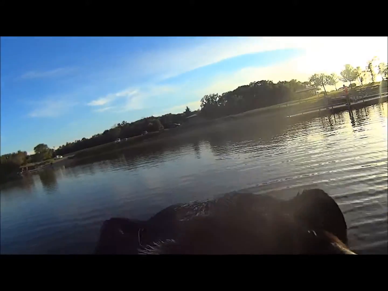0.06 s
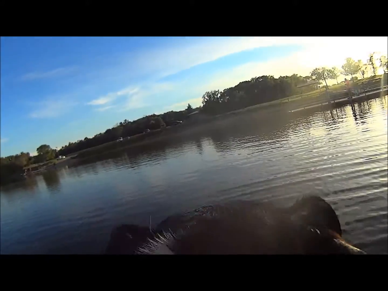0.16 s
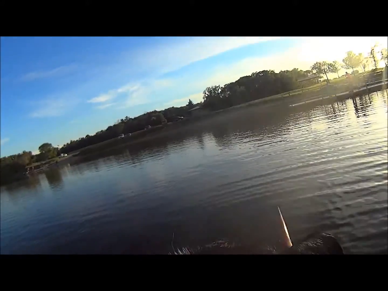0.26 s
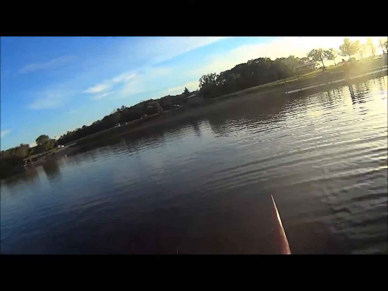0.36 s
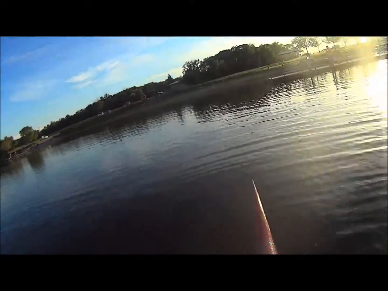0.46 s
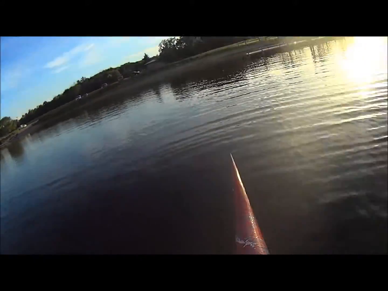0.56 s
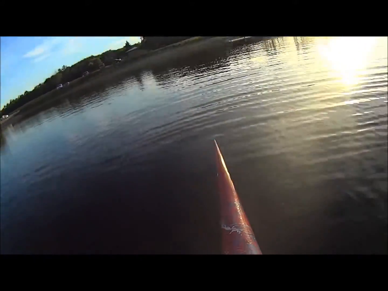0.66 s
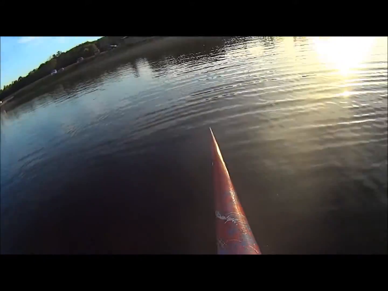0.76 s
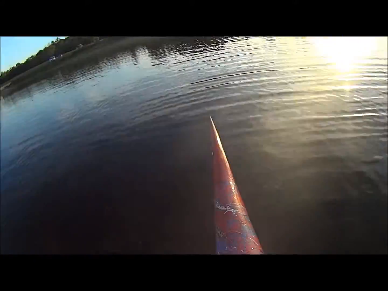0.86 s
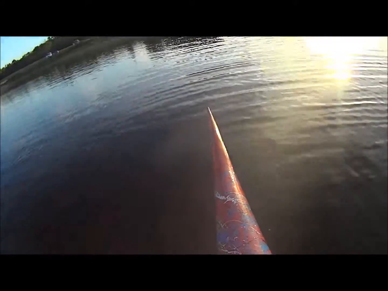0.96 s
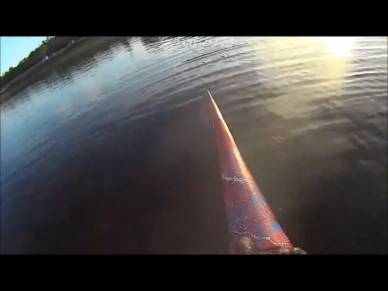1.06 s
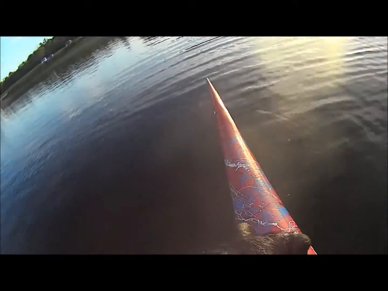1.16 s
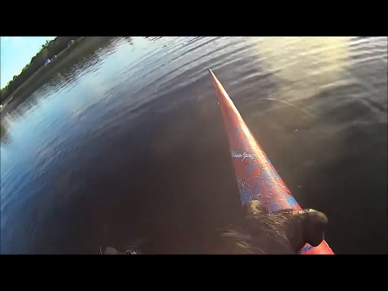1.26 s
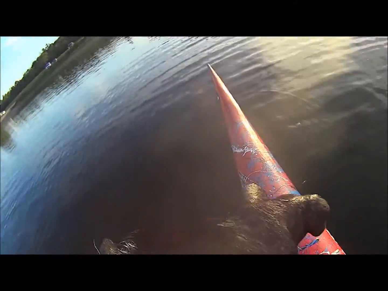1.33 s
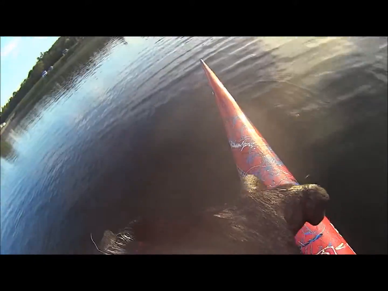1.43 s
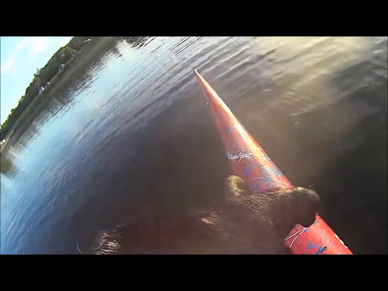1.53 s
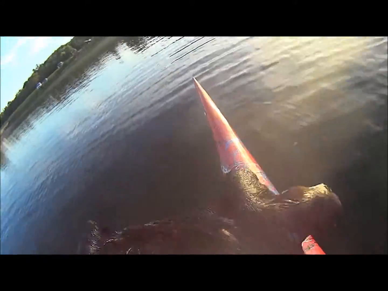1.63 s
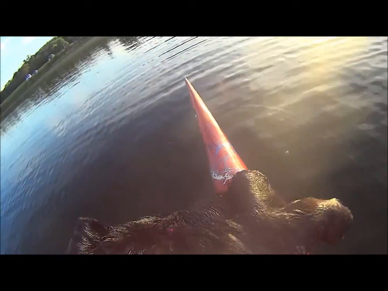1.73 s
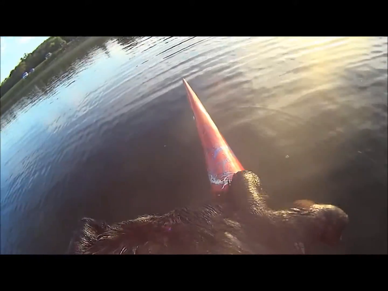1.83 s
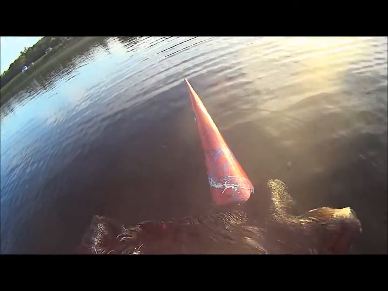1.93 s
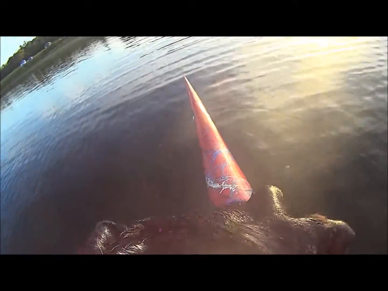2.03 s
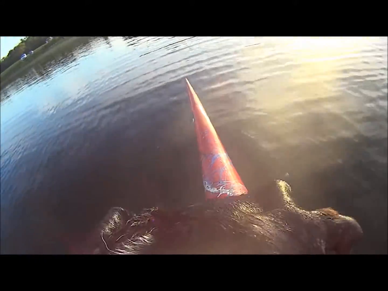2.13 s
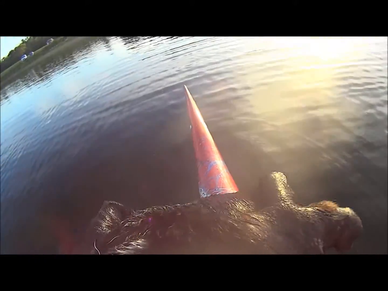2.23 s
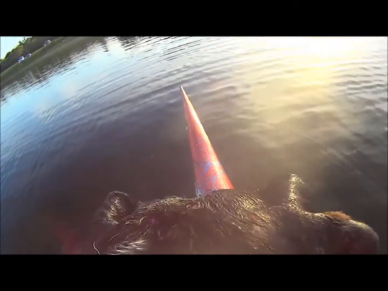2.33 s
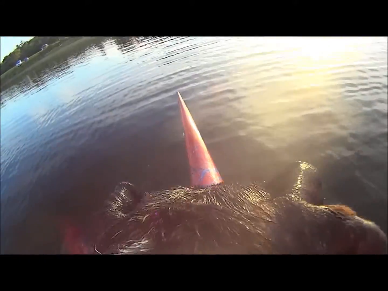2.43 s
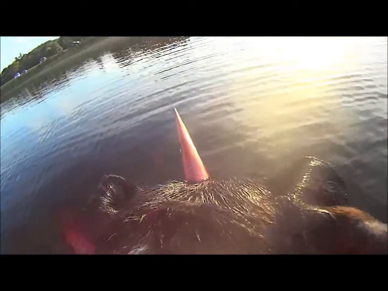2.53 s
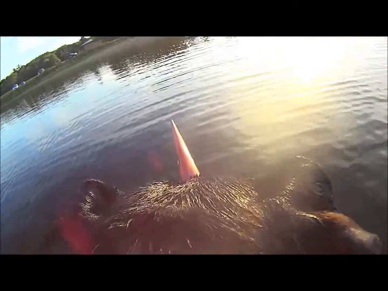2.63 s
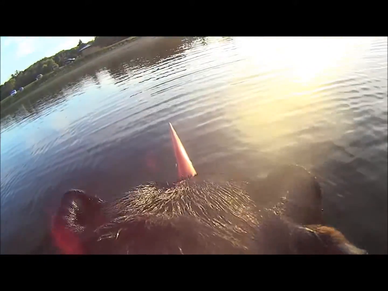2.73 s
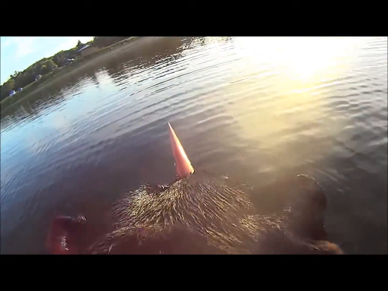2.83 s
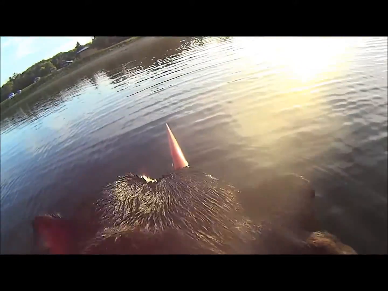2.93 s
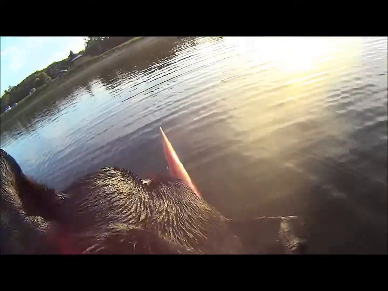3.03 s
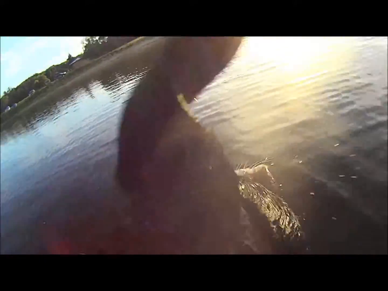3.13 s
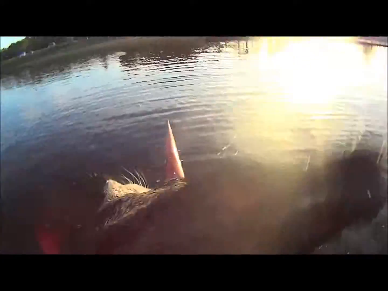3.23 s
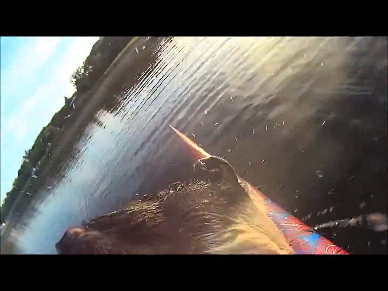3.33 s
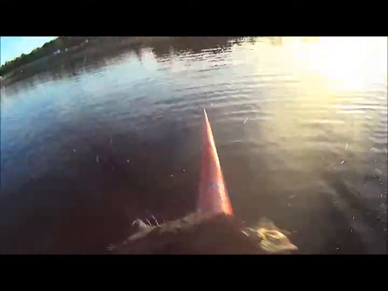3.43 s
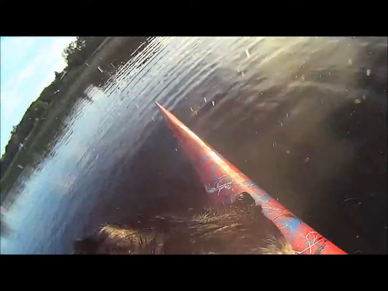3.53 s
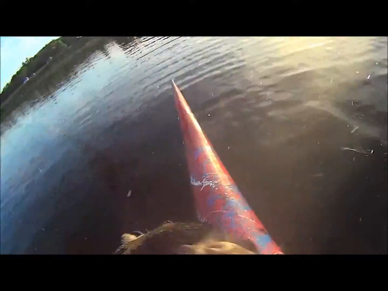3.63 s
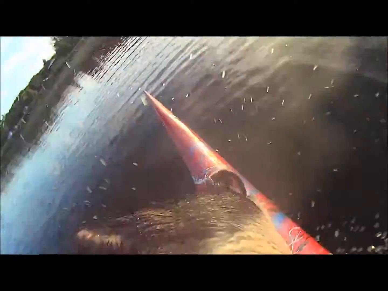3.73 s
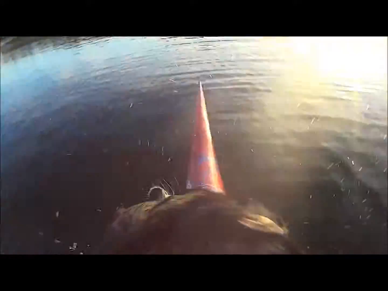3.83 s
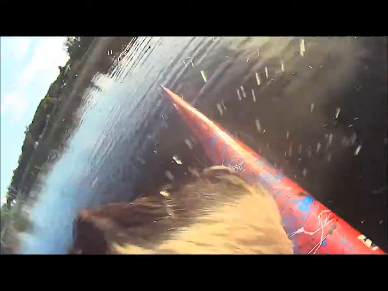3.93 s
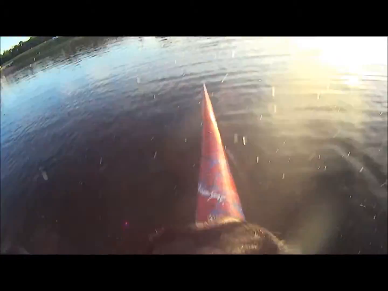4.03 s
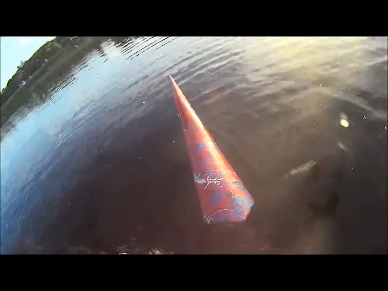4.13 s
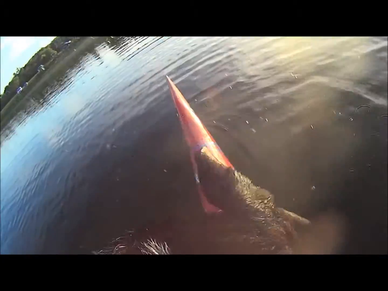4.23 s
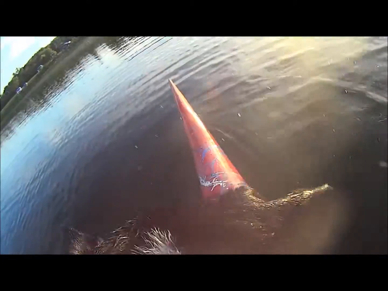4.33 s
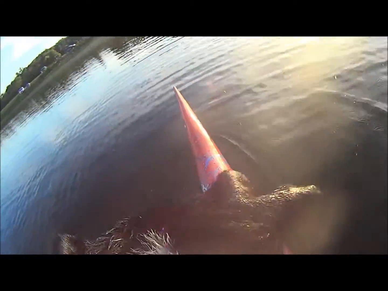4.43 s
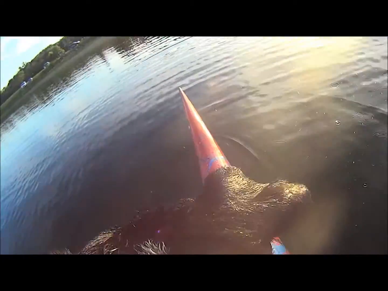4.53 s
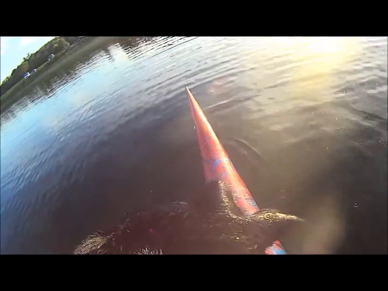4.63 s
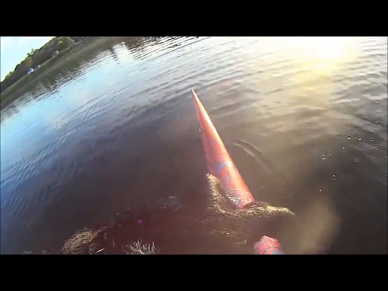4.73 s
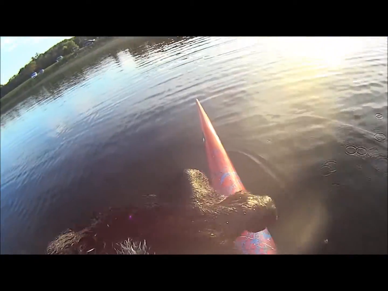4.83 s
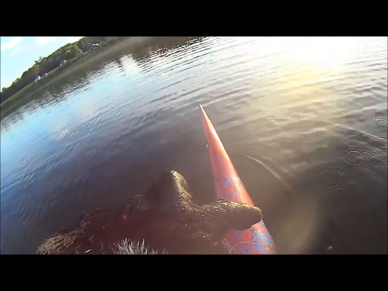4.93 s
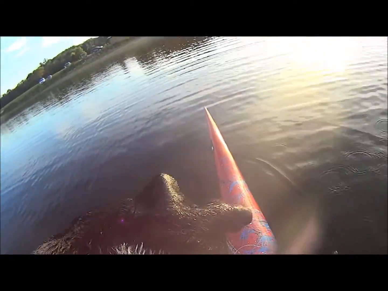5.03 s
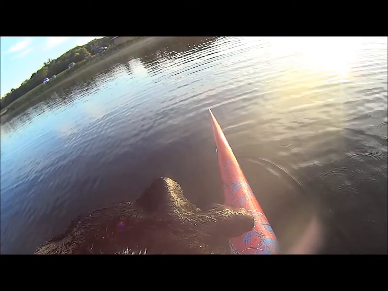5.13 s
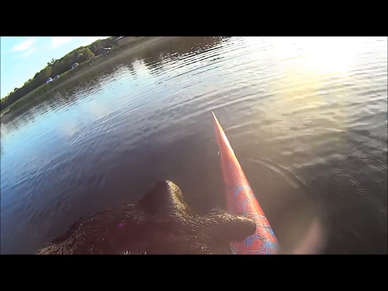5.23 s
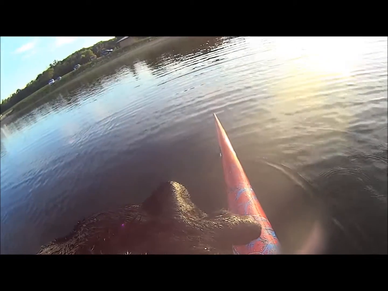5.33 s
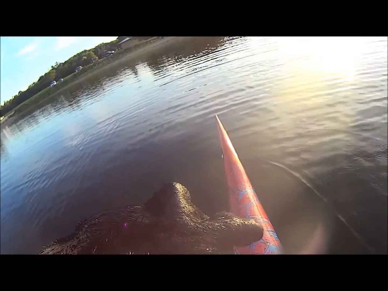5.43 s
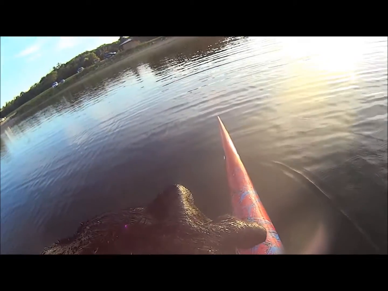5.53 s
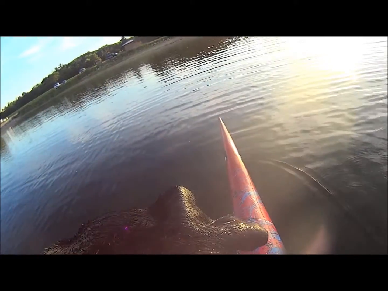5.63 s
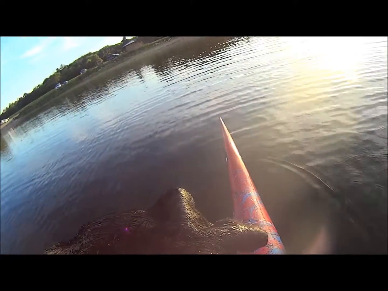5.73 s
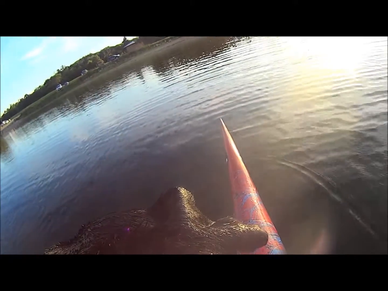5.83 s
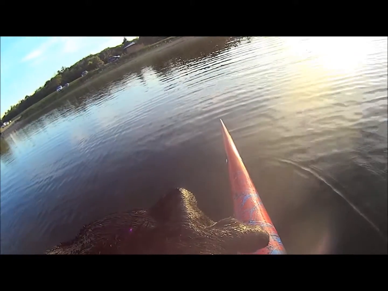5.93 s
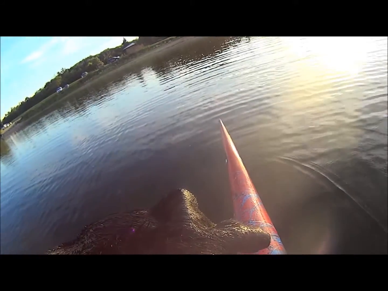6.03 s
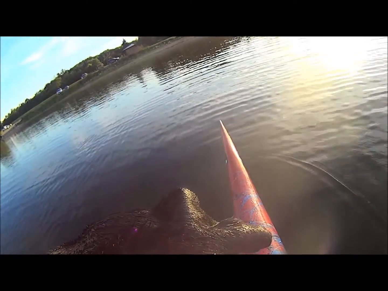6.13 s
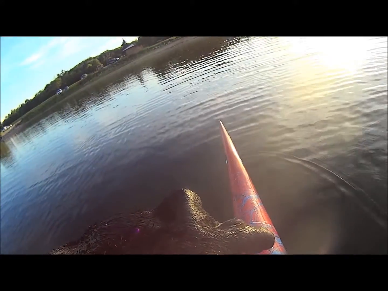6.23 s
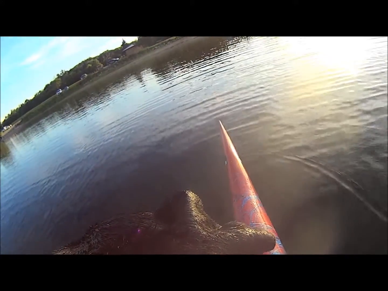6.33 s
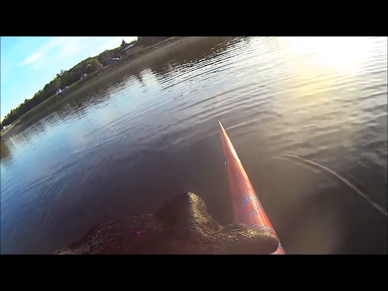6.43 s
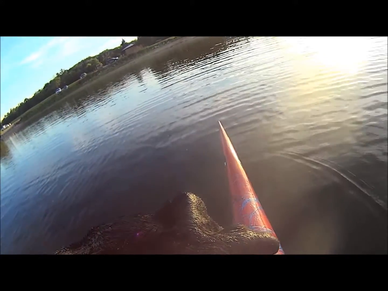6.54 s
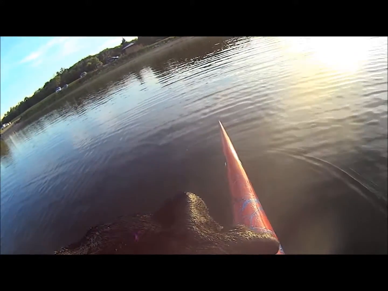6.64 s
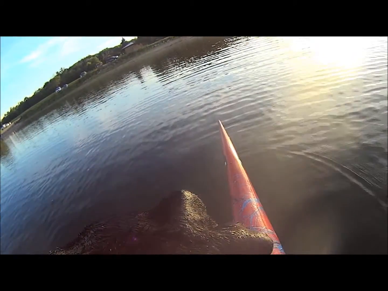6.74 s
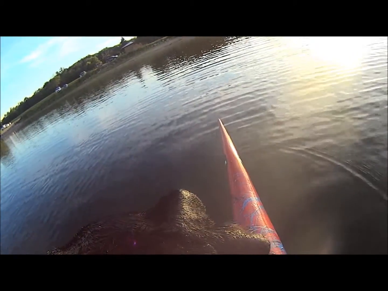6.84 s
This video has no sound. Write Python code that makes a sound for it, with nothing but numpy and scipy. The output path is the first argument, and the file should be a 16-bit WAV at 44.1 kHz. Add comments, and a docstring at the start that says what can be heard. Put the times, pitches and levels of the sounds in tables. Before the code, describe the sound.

Heard from inside a plastic case strapped to a wet dog's back by a calm lake. Soft nose puffs, low body rumble, small bumps and scattered harness ticks come first over faint hiss. Around the middle the dog shakes for about a second: five rapid swings of hard plastic clatter, water spray and heavy padded thumps. A last click or two, then quiet hiss and one gentle breath.

```python
"""Wet dog shaking by a calm lake

A wet dog with a plastic case on its back shifts about and snuffles (shaped noise) while its harness ticks.
Then it shakes for about a second, five swings: at one end of each the case clatters (noise bursts through
resonances) and water sprays (grains); at the other it is thrown into the coat and thumps (dying sines).
Two microphones inside the case hear it, much of it through the case's hollow ring, over a faint hiss."""
import sys
import numpy as np
from scipy import signal
from scipy.fft import rfft, irfft, next_fast_len
from scipy.io import wavfile
from scipy.ndimage import uniform_filter1d

SR = 44100
rng = np.random.default_rng(int(sys.argv[2]) if len(sys.argv) > 2 else 0)


def store_pcm(level_fs):
    """Save levels as 16-bit WAV."""
    pcm = np.round(np.clip(level_fs, -1, 1) * 32767).astype(np.int16)
    wavfile.write(sys.argv[1], SR, np.atleast_2d(pcm).T)


N = 303452
TIME = np.arange(N) / SR


def from_db(db):
    """Decibels to gain."""
    return 10 ** (np.asarray(db) / 20)


def rms_one(pair):
    """Scale a (sum, difference) pair so that the sum has rms 1."""
    return pair / np.sqrt(np.mean(pair[0] ** 2) + 1e-20)


def level_curve(rows):
    """Rows of (s, dB) as a gain over time, fading quickly outside their span."""
    s, db = np.transpose(rows)
    outside = np.maximum(np.maximum(s[0] - TIME, TIME - s[-1]), 0)
    return from_db(np.interp(TIME, s, db)) * np.exp(-outside / 0.024)


def log_frequencies(size):
    """Natural log of each spectrum bin's frequency in Hz."""
    return np.log(np.maximum(np.arange(size // 2 + 1) * SR / size, 1))


def colour(x, points):
    """Shape a sound by a smooth spectrum."""
    hz, db = np.transpose(points)
    size = next_fast_len(N)
    gain = from_db(np.interp(log_frequencies(size), np.log(hz), db))
    return irfft(rfft(x, size) * gain, size)[..., :N]


def noise():
    """White noise as a (sum, difference) pair."""
    return rng.standard_normal((2, N))


def flicker(rate, depth_db):
    """A gain that wanders at random, with a new target `rate` times a second."""
    targets = rng.standard_normal(4000)
    return from_db(depth_db * np.interp(TIME * rate, np.arange(len(targets)), targets))


def grains(per_s, spread_db):
    """Tiny impacts of uneven size at random moments."""
    sizes = from_db(spread_db * np.minimum(rng.exponential(1, N), 4))
    return noise() * sizes * (rng.random(N) < per_s / SR)


def resonance(x, hz, width):
    """One two-pole resonance with gain close to 1 on top; a wider one dies sooner."""
    r = np.exp(-np.pi * width / SR)
    feedforward = np.array([1, 0, -1]) * (1 - r * r) / 2
    feedback = [1, -2 * r * np.cos(2 * np.pi * hz / SR), r * r]
    return signal.lfilter(feedforward, feedback, x + 1e-18)


def lowpass(x, hz):
    """Gentle roll-off of the treble."""
    return signal.sosfilt(signal.butter(2, hz, fs=SR, output="sos"), x)


def add(out, s, sound):
    """Mix a sound in at a given time."""
    i = max(round(s * SR), 0)
    out[:, i:i + sound.shape[-1]] += sound[:, :N - i]


# Ringing modes of the plastic case.
# Each row: pitch in Hz before detuning, width in Hz, gain in dB over the direct sound.
CASE_MODES = [(343, 20.5, 9.5), (585, 30, 6), (722, 79, -2), (1465, 98, 2), (1641, 64, 18), (1616, 770, 6),
              (2857, 325, 15.5), (2920, 105, -14), (3107, 210, 14), (4790, 174, 13.5), (4900, 140, 2),
              (7360, 93, 8), (10600, 1400, 8.5)]


def case(x, detune=1):
    """The plastic case adds its modes to whatever touches it."""
    return x + sum(from_db(db) * resonance(x, hz * detune, width) for hz, width, db in CASE_MODES)


# How hard the dog shakes. Each row: time in seconds, vigour in dB.
SHAKE_EFFORT = [(3.04, -13), (3.12, -7.5), (3.21, 3.5), (3.4, 3.5), (3.93, 4.5), (4.04, 0.5), (4.17, -14),
                (4.24, -26)]


def effort(s):
    """Vigour of the shake in dB; practically nothing before and after it."""
    return np.interp(s, *np.transpose(SHAKE_EFFORT), left=-100, right=-100)


# The swings of the shake. Each row: middle of the clatter in seconds, its length in seconds,
# clatter in relative dB, rubbing of the fur on the way back in relative dB.
SHAKE_SWINGS = [(3.274, 0.12, -11.5, -32), (3.47, 0.083, -7.5, -61), (3.683, 0.075, -9, -46),
                (3.846, 0.044, 2, -23.5), (4.078, 0.05, -10, -29.5)]


def slap(s):
    """Gain of the clatter: it is on while a swing drives the case against its mount."""
    return sum(from_db(db) * np.exp(-(2 * (s - middle) / length) ** 4)
               for middle, length, db, _ in SHAKE_SWINGS)


THROW_LAG_S, THROW_S = 0.086, 0.027   # delay after the middle of a clatter; time to fall to 1/e either side


def throws():
    """One smooth hump per swing, as the weight of the case lands on the coat after the clatter."""
    return np.array([np.exp(-((TIME - middle - THROW_LAG_S) / THROW_S) ** 2) for middle, *_ in SHAKE_SWINGS])


def shake_moments(count):
    """Unevenly spaced moments from the start of the shake to its end."""
    start, end = 3.12, 4.19
    return start + (end - start) * (np.arange(count) + rng.random(count)) / count


# Colour of the open air. Each row: frequency in Hz, relative density in dB per Hz.
AIR_SPECTRUM = [(40, 14), (130, -17), (240, -8.5), (340, 5), (430, -12), (650, 4.5), (1050, 0), (1350, -4),
                (2000, -19), (2600, -15), (5000, -39)]
# Colour of the thin hiss. Each row: frequency in Hz, relative density in dB per Hz.
HISS_SPECTRUM = [(1500, 8.5), (2300, 2.5), (2950, 4.5), (3700, -1.5), (4400, -0.5), (4850, 2), (5600, -1.5),
                 (8000, -3), (11000, -5)]
# Air in the case hums at its modes.
# Each row: pitch in Hz, width in Hz of each of two passes, level in dB before flicker and swell.
HOLLOW_BANDS = [(555.4, 19, -67), (820, 117, -62), (1551, 285, -53)]
# The background dips after the shake and comes back. Each row: time in seconds, gain in dB.
BACKGROUND_SWELL = [(0, 2.5), (3.1, 3.5), (4.2, -1.5), (4.6, -1.5), (5.3, 0), (6.88, 1)]


def background(air_db=-61, hiss_db=-58.5):
    """Open air over the lake, hollow bands where the case resonates, and thin hiss, all from noise."""
    air = from_db(air_db) * rms_one(colour(noise(), AIR_SPECTRUM))
    hollow = np.zeros((2, N))
    for hz, width, db in HOLLOW_BANDS:
        band = resonance(resonance(noise(), hz, width), hz, width)
        hollow += from_db(db) * rms_one(band)
    hollow *= flicker(rate=13, depth_db=2.0)
    hiss = from_db(hiss_db) * rms_one(colour(noise(), HISS_SPECTRUM))
    return level_curve(BACKGROUND_SWELL) * (air + hollow + hiss)


# Harness shifting on the coat. Each row: time in seconds, level in dB before the trim.
HARNESS_SHIFT = [(0, -45), (0.3, -50.5), (0.68, -37.5), (1.0, -44.5), (1.85, -45), (2.15, -50), (2.6, -49),
                 (2.85, -54.5), (3.05, -40), (4.24, -56), (4.75, -56), (5.45, -61.5), (5.8, -56),
                 (6.2, -61), (6.55, -50), (6.88, -58)]
# Colour of the body's rumble, used for the shake as well.
# Each row: frequency in Hz, relative density in dB per Hz.
RUMBLE_SPECTRUM = [(15, -24), (33, 1), (60, -3.5), (110, -7), (190, -4.5), (300, -10.5), (500, -22.5),
                   (1200, -62)]


def harness_shifting(trim_db=-1.5):
    """The body rumbles under the harness: low noise of wandering strength."""
    rumble = rms_one(colour(noise() * flicker(rate=25, depth_db=4.0), RUMBLE_SPECTRUM))
    return from_db(trim_db) * level_curve(HARNESS_SHIFT) * rumble


# The case bumps on the dog's back.
# Each row: start in seconds, level in dB before rise and decay, settled pitch in Hz.
BACK_BUMPS = [(0.34, -20.5, 163), (0.625, -24, 86), (0.666, -17, 33.3), (0.898, -16.5, 140),
              (0.925, -22, 45.6), (1.068, -21.5, 153), (1.089, -19.5, 174), (1.268, -18, 84.5),
              (3.185, -11.5, 35.5), (3.359, -9, 55.7), (3.40, -4, 169), (3.411, -8, 327), (3.518, -5, 45.4),
              (3.544, -5, 95), (3.621, -3.5, 222), (3.74, -0.5, 130), (3.907, 2, 107), (3.93, 1, 174),
              (4.016, -9.5, 138), (5.8, -35, 45), (6.498, -26, 217), (6.549, -35, 202)]
BUMP_S, BUMP_HZ = 0.0067, 96   # dying time of a bump at this pitch; higher ones die sooner


def bumps(size=8192, rise_s=0.0046):
    """The case rocks briefly on the soft back, dropping in pitch as it settles."""
    out, t = np.zeros((2, N)), np.arange(size) / SR
    rows = np.vstack([BACK_BUMPS, jolts()])
    sideways_phases = rng.uniform(0, 2 * np.pi, len(rows))
    for (s, db, hz), sideways in zip(rows, sideways_phases):
        dying_s = BUMP_S * np.sqrt(BUMP_HZ / hz)
        turns = hz * t + 0.18 * (1 - np.exp(-t / 0.0015))
        swing = np.sin(2 * np.pi * turns + np.array([[0], [sideways]]))
        envelope = (1 - np.exp(-t / rise_s)) * np.exp(-t / dying_s)
        add(out, s, from_db(db) * swing * envelope)
    return out


def jolts(count=24, low_hz=70, high_hz=420, jolt_db=-17, uneven_db=5.0):
    """Rows like the bumps': further bumps of random pitch, all through the shake."""
    s = shake_moments(count)
    hz = low_hz * (high_hz / low_hz) ** rng.random(count)
    db = jolt_db + effort(s) + uneven_db * rng.standard_normal(count)
    return np.transpose([s, db, hz])


# The dog's puffs through its nose. Each row: peak in seconds, rise in seconds, fall in seconds,
# level in dB before case and trim, flutter from 0 to 1.
NOSE_PUFFS = [(0.545, 0.078, .11, -49, 0.2), (0.67, .01, 0.034, -42, 0), (1.115, 0.048, .035, -49, 0),
              (1.37, .08, .11, -47.5, 0.08), (1.605, 0.062, 0.092, -40, 0.2),
              (2.578, 0.15, 0.15, -42, 0.36), (2.959, 0.088, 0.084, -40.5, 0.17),
              (4.87, .27, 0.18, -46.5, 0.08)]
# Colour of the breath. Each row: frequency in Hz, relative density in dB per Hz.
PUFF_SPECTRUM = [(100, -0.5), (220, 3), (450, -9.5), (750, 3.5), (1100, -10.5), (1600, -14), (2200, -18),
                 (3000, -32), (4000, -47), (8000, -66)]


def snuffles(mean_flutter_hz=240, snore_db=-2, trim_db=-1.0):
    """Air rushes through the dog's nose; in some puffs the nostrils flutter, and snore at the height."""
    flow, snore = np.zeros(N), np.zeros(N)
    flutter_hz = mean_flutter_hz * flicker(rate=27, depth_db=8.0)   # the pitch wanders widely
    cycle = np.sin(2 * np.pi * np.cumsum(flutter_hz) / SR)
    for peak, rise, fall, db, flutter in NOSE_PUFFS:
        swell = np.interp(TIME - peak, [-rise, 0, fall], [0, 1, 0])
        flutter = np.clip(flutter, 0, 1)
        flow += from_db(db) * swell * (1 + flutter * cycle)
        snore += from_db(db + snore_db) * flutter * swell ** 5 * cycle
    breath = flow * rms_one(colour(noise(), PUFF_SPECTRUM))
    return case(breath) * from_db(trim_db) + snore


# Hard contacts of the case and its mount that stand out.
# Each row: start in seconds, knock in dB, click in dB, both before the gain of the part.
HARD_CONTACTS = [(0.666, -46, -49), (0.747, -31.5, -60), (1.132, -28.5, -41), (1.388, -30, -35.5),
                 (1.503, -31.5, -31.5), (1.564, -37, -27), (1.587, -22.5, -31), (1.643, -35.5, -31.5),
                 (1.779, -33, -33.5), (1.995, -31, -26), (2.016, -35.5, -35), (2.281, -33.5, -38.5),
                 (2.312, -39, -42.5), (2.692, -33, -44), (2.977, -31.5, -54), (3.119, -16.5, -32.5),
                 (3.1444, -18, -17), (3.2156, -15.5, -16), (3.2236, -18, -11.5), (3.2372, -23, -14),
                 (3.2452, -17, -17), (3.271, -18, -37), (3.277, -19, -15), (3.296, -16.5, -11.5),
                 (3.3334, -16, -15.5), (3.4315, -13, -19.5), (3.451, -19, -16), (3.4661, -20, -14),
                 (3.494, -18.5, -13), (3.547, -14.5, -39), (3.624, -28, -23.5), (3.642, -34, -12),
                 (3.659, -22, -18), (3.686, -20.5, -12.5), (3.697, -19.5, -10.5), (3.7358, -13, -18.5),
                 (3.813, -18, -24), (3.827, -26, -23), (3.858, -24, -15), (3.8765, -19, -13.5),
                 (4.032, -17.5, -29.5), (4.069, -19.5, -12), (4.135, -39, -26.5), (4.186, -38, -41),
                 (4.3444, -27.5, -19), (4.508, -47.5, -43), (5.786, -48, -54)]
# Dull flaps of wet ears and coat against the case. Each row: start in seconds, thud in dB before the trim.
DULL_FLAPS = [(1.614, -32), (3.369, -19), (3.401, -20.5), (3.416, -19), (3.475, -13.5), (3.57, -11.5),
              (3.63, -14), (3.67, -20), (3.799, -16.5), (3.89, -9.5), (3.974, -15), (4.005, -23),
              (4.08, -24), (4.169, -31.5)]
THUD_DB, PADDED_DB = -9, 6.5   # thud against its knock; added when the case is pressed into the coat
FLAP_KNOCK_DB, FLAP_CLICK_DB = -6.5, -35   # how much of a flap rings the case, against its thud


def contacts(count=120, soft_db=-35, knock_db=-29, click_db=-22, slack_db=-33, knock_follows=0.45,
             uneven_db=5.5):
    """Rows of (s, thud dB, knock dB, click dB): hard contacts, rebounds, flaps, and touches with the swings."""
    s, knock, click = np.transpose(HARD_CONTACTS)
    pressed = np.clip(from_db(effort(s) / 2) * (1 - slap(s)), 0, 1)
    hard = np.transpose([s, knock + THUD_DB + PADDED_DB * pressed, knock, click])
    flaps = [(s, db, db + FLAP_KNOCK_DB, db + FLAP_CLICK_DB) for s, db in DULL_FLAPS]
    # a scatter of lesser touches, brighter while the case clatters
    s = shake_moments(count)
    bright = 20 * np.log10(slap(s) + from_db(slack_db))
    levels = np.transpose([np.full(count, soft_db), knock_db + knock_follows * bright, click_db + bright])
    levels = levels + effort(s)[:, None] + uneven_db * rng.standard_normal((count, 3))
    touches = np.column_stack([s, levels])
    return np.vstack([touches, hard, rebounds(hard), flaps])


def rebounds(hard, delay_s=0.0042, rebound_db=-8, uneven_db=3.5):
    """The case springs back and touches again a few milliseconds after each hard contact."""
    chance = rng.standard_normal(hard.shape)
    s = hard[:, 0] + delay_s * np.exp(.3 * chance[:, 0])
    return np.column_stack([s, hard[:, 1:] + rebound_db + uneven_db * chance[:, 1:]])


# The ringing parts of a contact, first the hollow knock, then the bright click.
# Each row: low edge in Hz, high edge in Hz, dying time in seconds, snap against the chatter, gain in dB.
RINGING_PARTS = [(1278, 2262, 0.0006, 4.1, 1.5), (2140, 7600, 0.0013, 3.3, -3.5)]


def rattle(hits, size=2048, chatter_db=-24, chatter_s=.008):
    """Each contact is a snap and a brief chatter that set the case ringing, as a knock and a click."""
    out, t = np.zeros((2, N)), np.arange(size) / SR
    # strap pressure and water shift the modes a little from hit to hit
    detunes = 1 + .03 * rng.standard_normal(len(hits))
    for k, (low, high, dying_s, snap, gain_db) in enumerate(RINGING_PARTS):
        envelope = np.exp(-t / dying_s) + from_db(chatter_db) * np.exp(-t / chatter_s)
        force = rng.standard_normal((len(hits), 2, size)) * envelope
        force[:, :, 0] += snap * rng.choice([-1, 1], (len(hits), 2))
        band = signal.butter(3, [low, high], "band", fs=SR, output="sos")
        pushes = signal.sosfilt(band, force)
        for row, push, detune in zip(hits, pushes, detunes):
            db = row[k + 2]
            ring = struck(case(push, detune), (low, high), db)
            add(out, row[0], ring * from_db(db + gain_db))
    return out


def struck(ring, band, db, hard_db=-16, octave_db=22, scatter=0.304, spot_db=6):
    """Harder contacts reach higher, and each favours a pitch of its own spot; loudest 3 ms at rms 1."""
    low, high = band
    top_hz = np.clip(1.18 * high * 2 ** ((db - hard_db) / octave_db), 1.4 * low, .45 * SR)
    ring = lowpass(ring, top_hz)
    spot_hz = low * (high / low) ** np.clip(0.349 + scatter * rng.standard_normal(), 0, 1)
    ring = ring + from_db(spot_db) * resonance(ring, spot_hz, 0.089 * spot_hz)
    power = uniform_filter1d(ring ** 2, size=132, axis=-1)   # over 3 ms
    return ring / np.sqrt(power.max(axis=-1, keepdims=True))


def thuds(hits, size=1024, mid_hz=780, octave_db=24, cycles=0.99, rise_cycles=0.094, trim_db=-0.5):
    """The padded part of a contact is one quick swing; harder contacts are shorter and so higher."""
    out, t = np.zeros((2, N)), np.arange(size) / SR
    chances = rng.standard_normal((len(hits), 2, 2))
    for (s, thud_db, knock_db, _), chance in zip(hits, chances):
        hardness = np.clip((knock_db - thud_db) / octave_db, -.8, .25)   # in octaves
        turns = mid_hz * 2 ** (hardness + 0.3 * chance[:, :1]) * t
        swing = np.sin(2 * np.pi * turns) * (1 - np.exp(-turns / rise_cycles)) * np.exp(-turns / cycles)
        # a thud's level is its energy spread over 3 ms
        height = np.sqrt(.003 * SR / np.sum(swing[0] ** 2)) * from_db(thud_db + trim_db)
        add(out, s, height * swing * np.sign(chance[:, 1:]))
    return out


# Wet crackles of the harness on the coat.
# Each row: start in seconds, peak in seconds, end in seconds, gain at the peak in dB.
HARNESS_CRACKLES = [(0.842, 0.857, 0.89, -51), (1.39, 1.4, 1.5, -52), (1.556, 1.591, 1.625, -33.5),
                    (2.13, 2.165, 2.185, -50), (3.91, 3.933, 3.98, -30)]
# Colour of the pops. Each row: frequency in Hz, relative density in dB per Hz.
CRACKLE_SPECTRUM = [(700, 1), (1400, -32), (2100, 4), (3300, -4), (4500, 0.5), (5800, -4), (8000, -27)]


def crackles():
    """Wet straps peel off the fur in short runs of tiny pops."""
    peel = sum(from_db(db) * np.interp(TIME, [start, peak, end], [0, 1, 0]) ** 2
               for start, peak, end, db in HARNESS_CRACKLES)
    pops = grains(per_s=430, spread_db=-3.0)
    return peel * rms_one(case(colour(pops, CRACKLE_SPECTRUM)))


def heaving(rumble_db=-31.5, throw_db=-26, top_hz=160):
    """The shaking body rumbles deeply, swelling at each throw; levels are before the vigour."""
    strength = from_db(rumble_db) + from_db(throw_db) * throws().sum(axis=0)
    deep = rms_one(lowpass(colour(noise(), RUMBLE_SPECTRUM), top_hz))
    return from_db(effort(TIME)) * strength * deep


# Colour of water droplets. Each row: frequency in Hz, relative density in dB per Hz.
SPRAY_SPECTRUM = [(800, 9), (2200, -9.5), (3500, -4.5), (5500, -5), (8000, -6), (11000, -26)]


def water_spray(spray_db=-35, drip_db=-52):
    """Droplets pepper the case with each clatter and drip between; levels are before the vigour."""
    strength = from_db(drip_db) + from_db(spray_db) * slap(TIME)
    droplets = grains(per_s=3400, spread_db=2.5)
    return from_db(effort(TIME)) * strength * rms_one(case(colour(droplets, SPRAY_SPECTRUM)))


# Colour of wet fur. Each row: frequency in Hz, relative density in dB per Hz.
FUR_SPECTRUM = [(120, -1), (280, 2.5), (600, 3), (1000, 6), (1600, -8.5), (2300, -7.5), (3500, -26.5),
                (8000, -41)]


def fur_rubbing(fur_db=-39, scrub_trim_db=-1):
    """Wet fur rubs the case and scrubs it at each throw; levels are before the vigour."""
    scrubs = from_db(scrub_trim_db + np.array(SHAKE_SWINGS)[:, -1]) @ throws()
    strength = from_db(fur_db) + scrubs
    fur = rms_one(case(colour(grains(per_s=600, spread_db=2.0), FUR_SPECTRUM)))
    fur = rms_one(fur * flicker(rate=89, depth_db=2.5))   # the coat touches and leaves the case in clumps
    return from_db(effort(TIME)) * strength * fur


# Left-right difference against the sum. Each row: frequency in Hz, difference in dB,
# share that is the sum a quarter cycle late (held to -1..1, negative is early).
STEREO_WIDTH = [(30, -19, 0.95), (100, -11.5, -0.44), (200, -4.5, 1), (377, 6, 0.68), (790, -4, 0.26),
                (1130, 2, 0.69), (1630, -14, 0.1), (2060, -3, 0.94), (2560, 5, -0.26), (3040, -4.5, -1.06),
                (3980, 6, 0.64), (4370, -5.5, 1), (6700, 0.5, 0.98), (10600, -5.5, 0.72)]


def microphones(mid, side):
    """Two microphones in the case differ partly by the sum a quarter cycle off, partly by their own sound."""
    hz, db, late = np.transpose(STEREO_WIDTH)
    size = next_fast_len(N)
    log_hz = log_frequencies(size)
    share = np.clip(np.interp(log_hz, np.log(hz), late), -1, 1)
    own = np.sqrt(1 - share ** 2) * rfft(side, size)
    shifted = -1j * share * rfft(mid, size)
    width = from_db(np.interp(log_hz, np.log(hz), db))
    difference = irfft((own + shifted) * width, size)[:N]
    return np.array([mid + difference, mid - difference])


def scene():
    """The dog, its harness and the lake, heard from inside the case."""
    hits = contacts()
    quiet = background() + harness_shifting() + snuffles() + crackles()
    impacts = bumps() + rattle(hits) + thuds(hits)
    shake = heaving() + water_spray() + fur_rubbing()
    mid, side = quiet + impacts + shake
    return microphones(mid, side)


def record(dry):
    """Peaks are rounded and the top is cut steeply."""
    top, cutoff_hz = 0.48, 11050
    rounded = top * np.tanh(dry / top)
    return signal.sosfilt(signal.ellip(10, .3, 70, cutoff_hz, fs=SR, output="sos"), rounded)


dry = scene()
out = record(dry)
store_pcm(out)
```